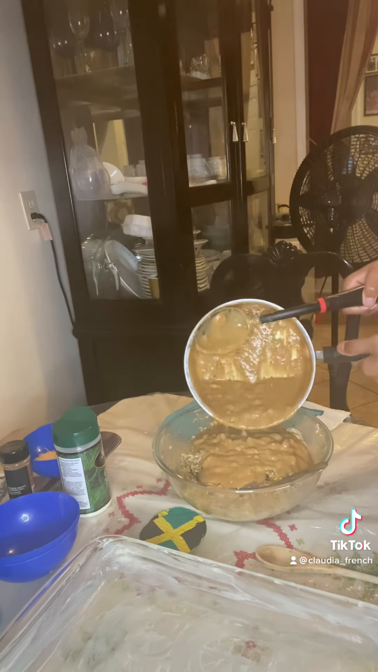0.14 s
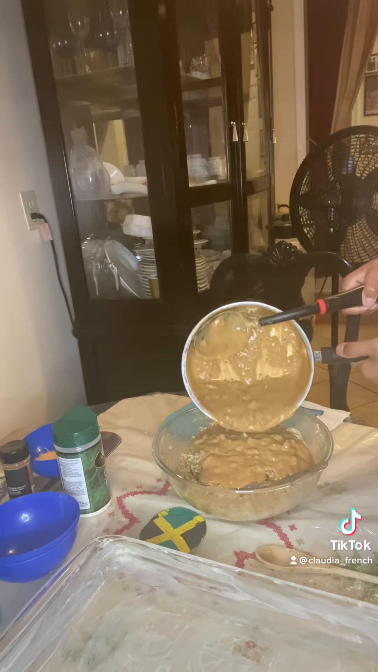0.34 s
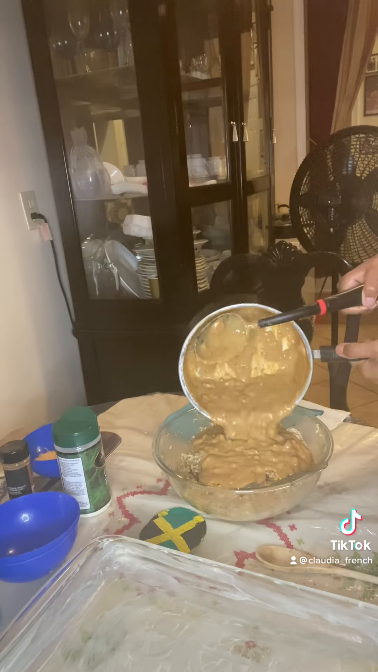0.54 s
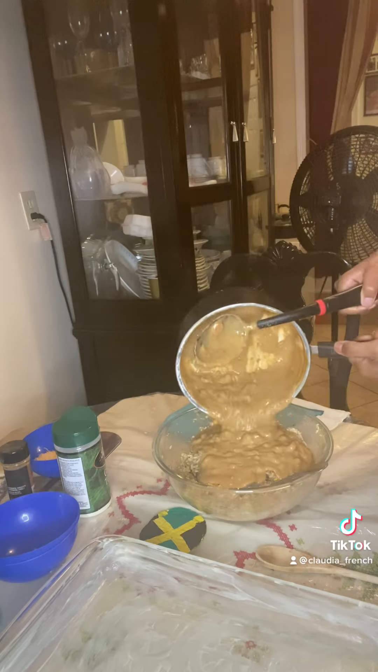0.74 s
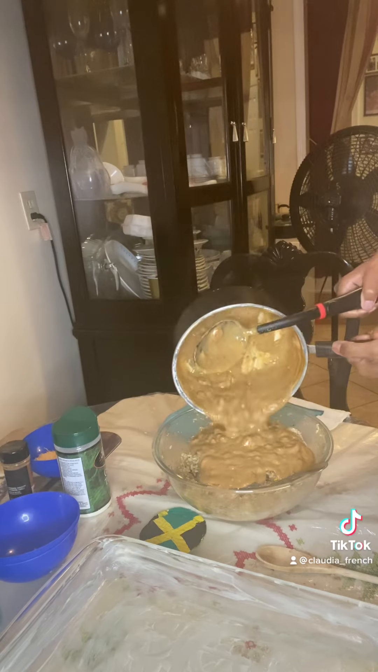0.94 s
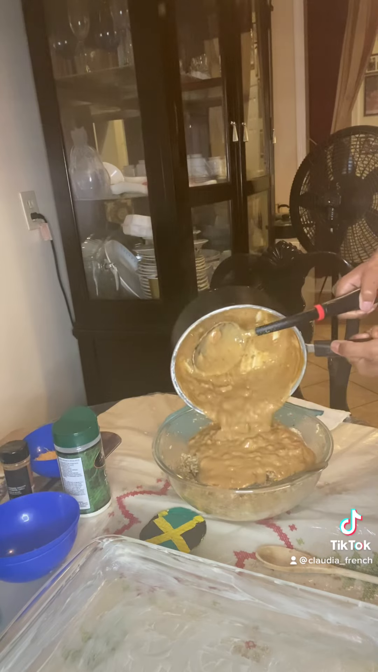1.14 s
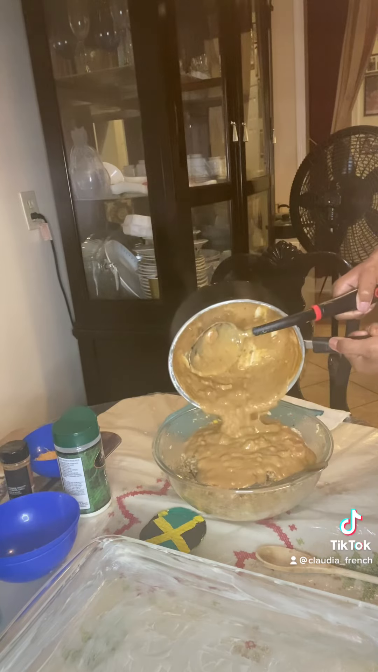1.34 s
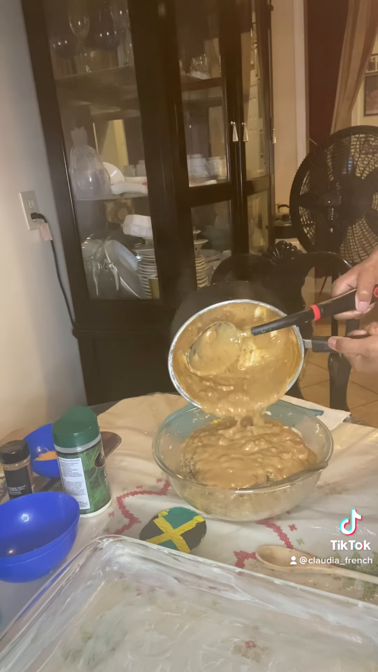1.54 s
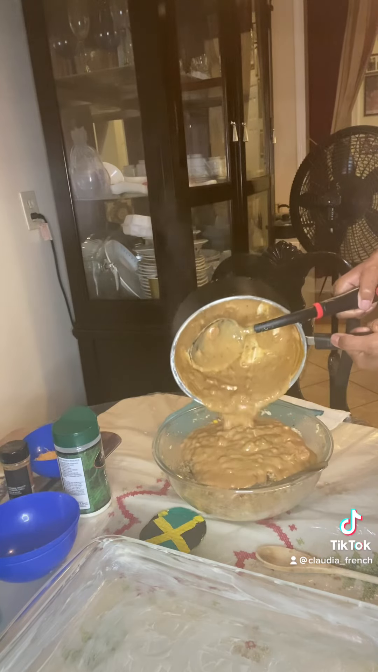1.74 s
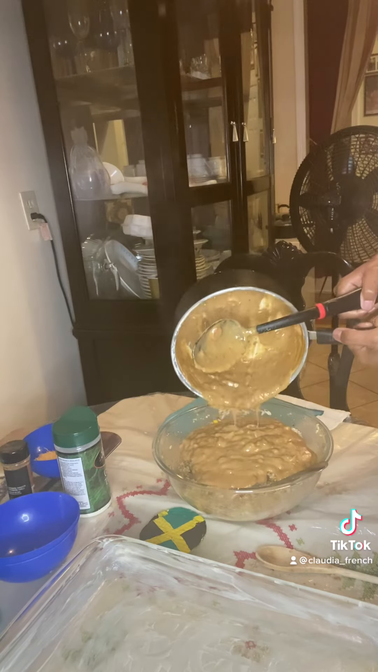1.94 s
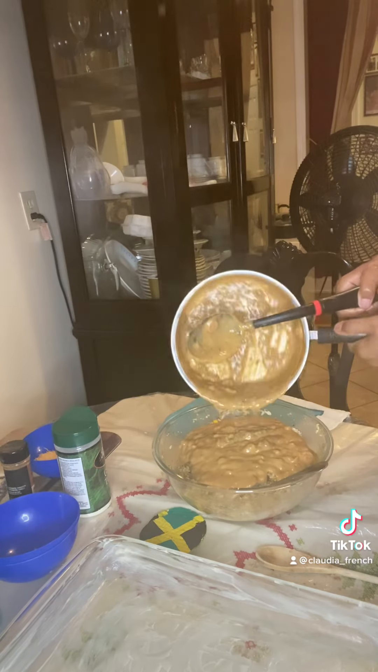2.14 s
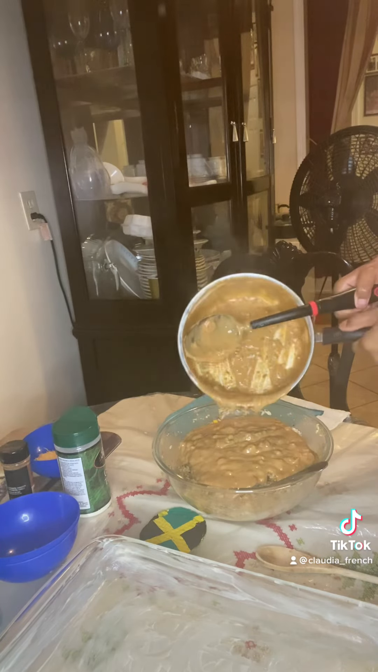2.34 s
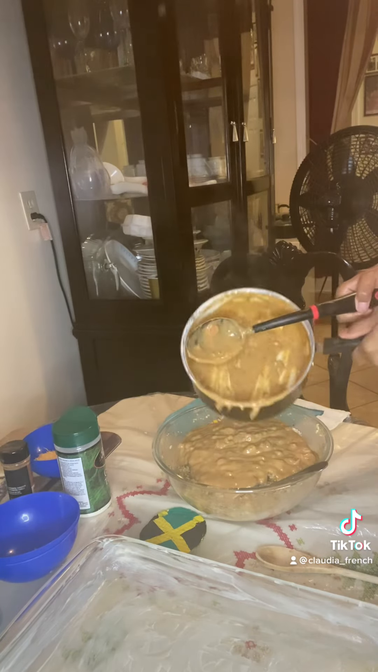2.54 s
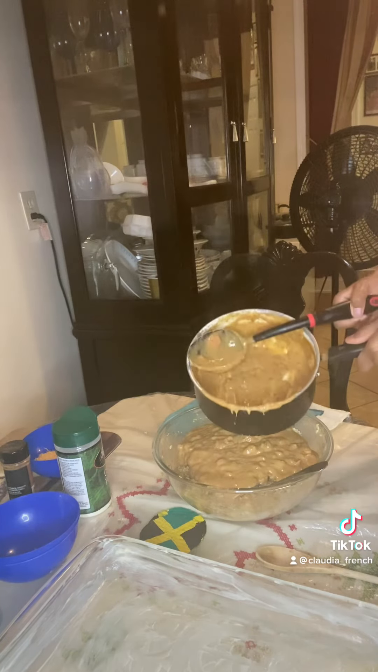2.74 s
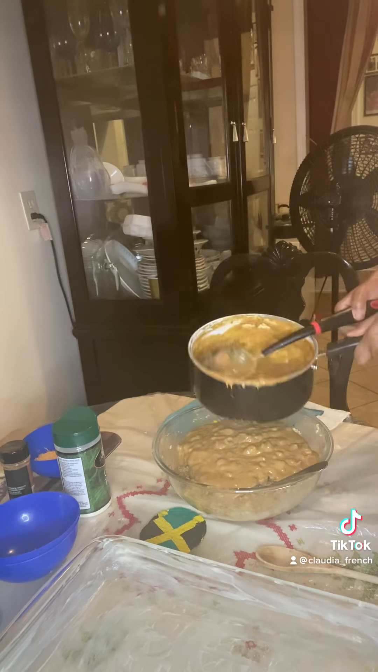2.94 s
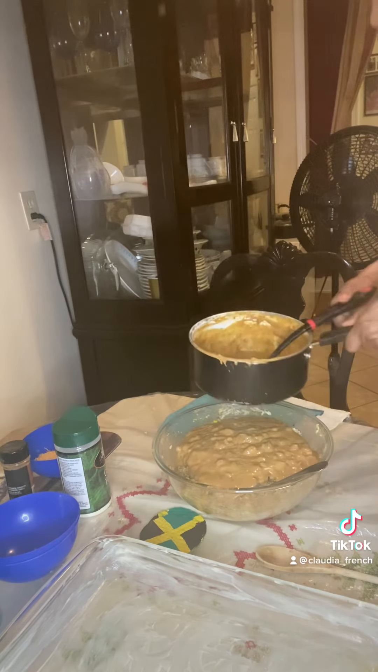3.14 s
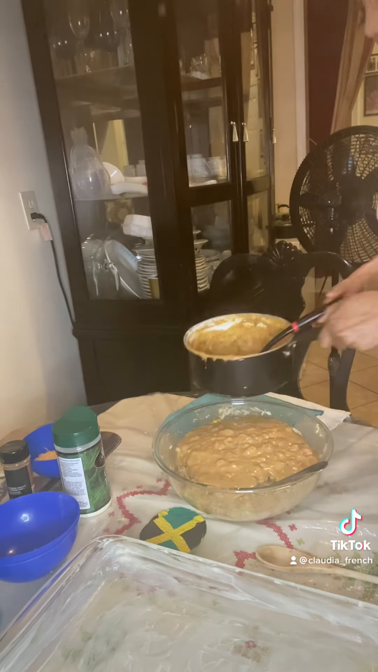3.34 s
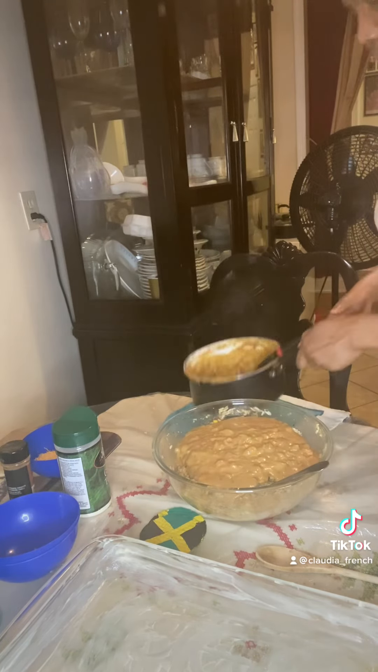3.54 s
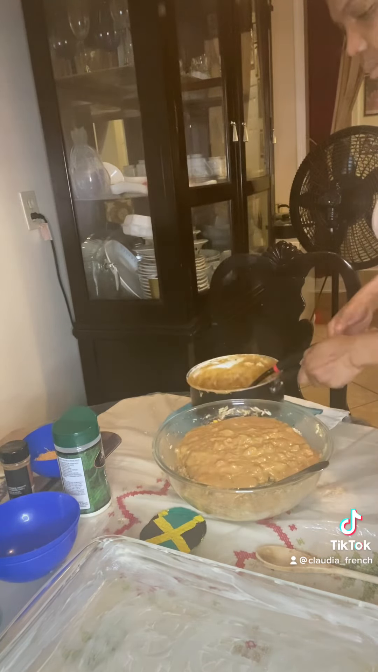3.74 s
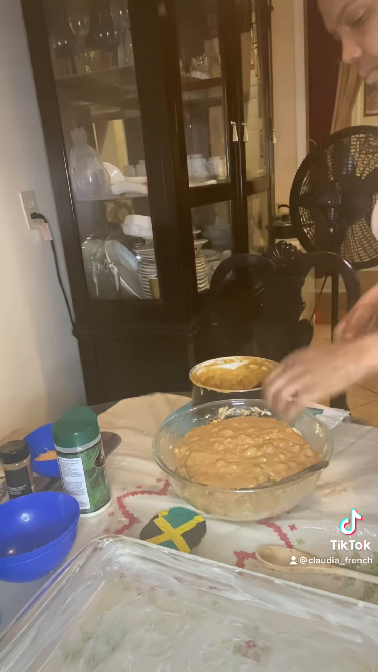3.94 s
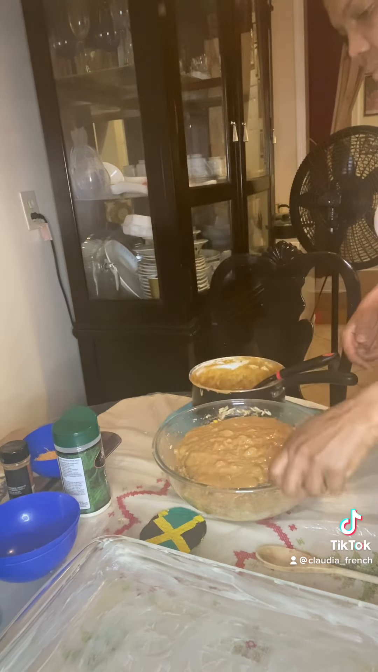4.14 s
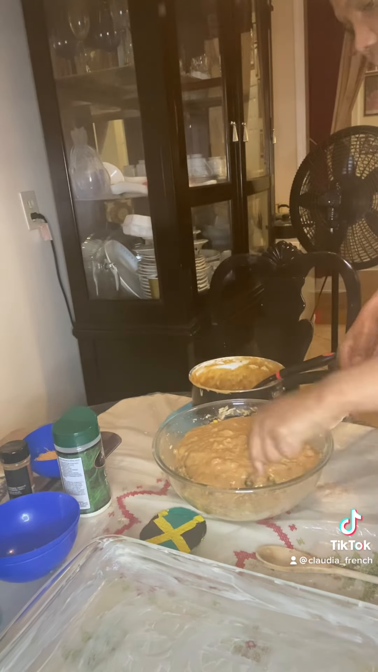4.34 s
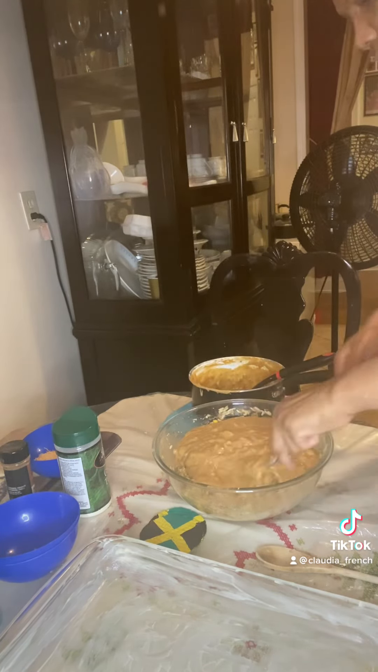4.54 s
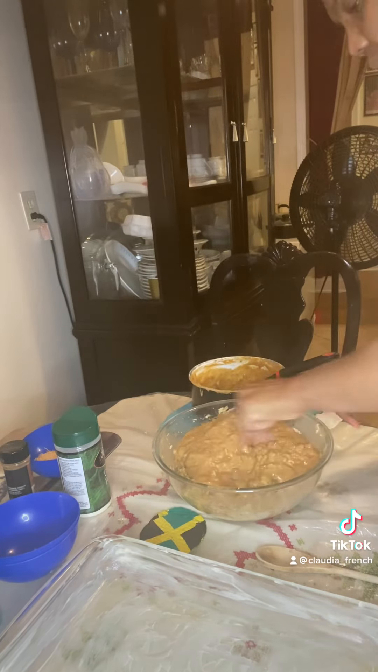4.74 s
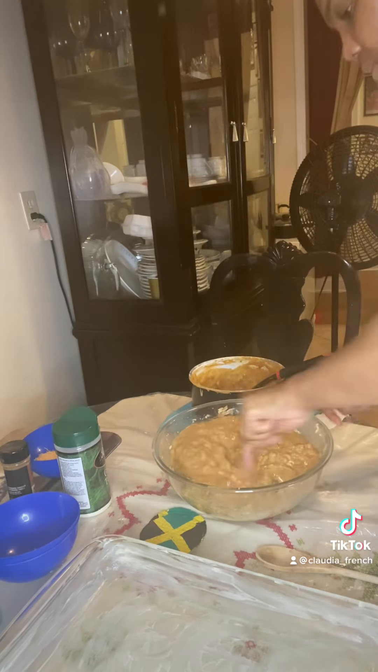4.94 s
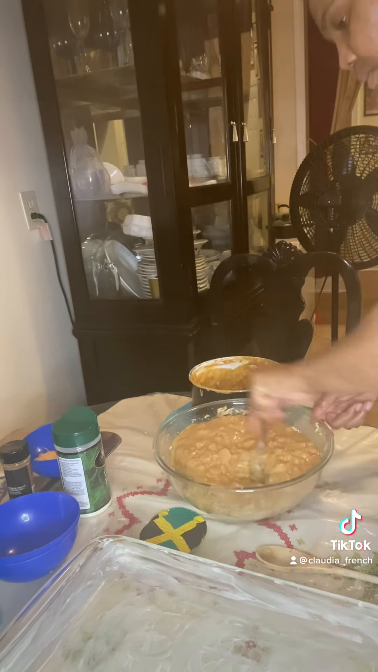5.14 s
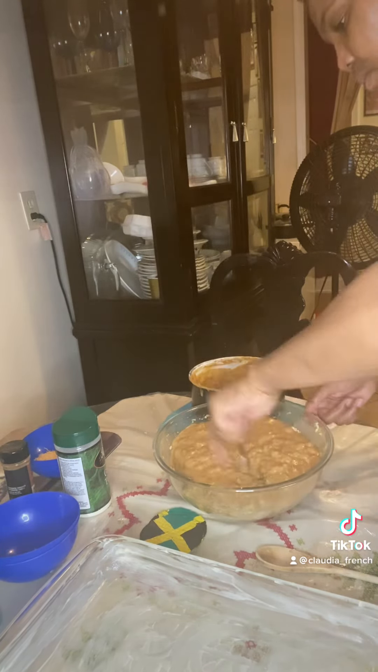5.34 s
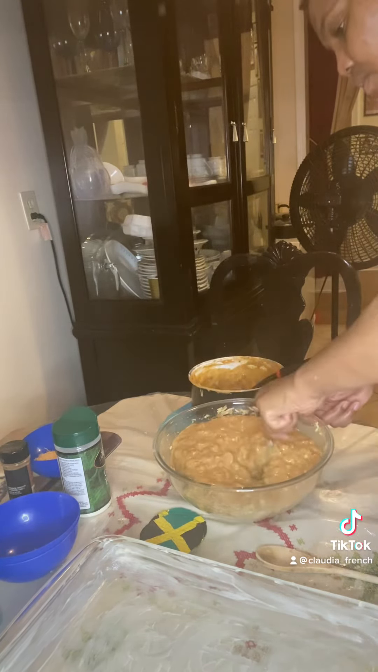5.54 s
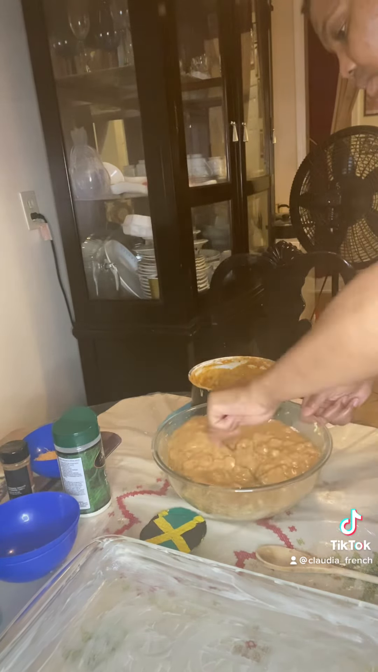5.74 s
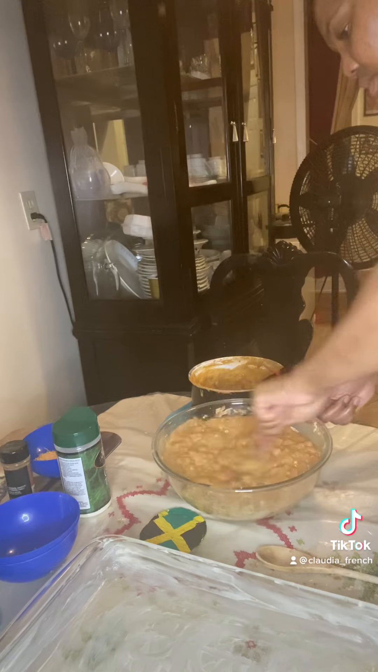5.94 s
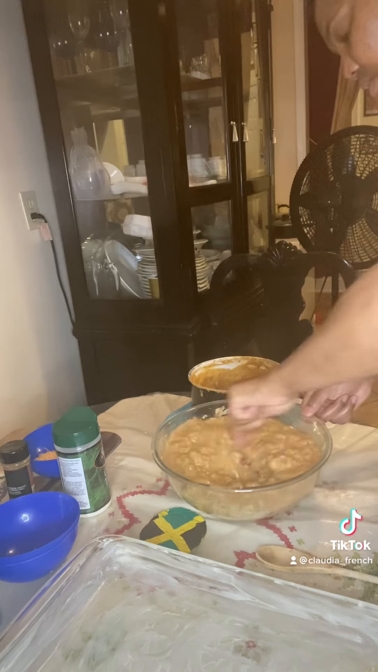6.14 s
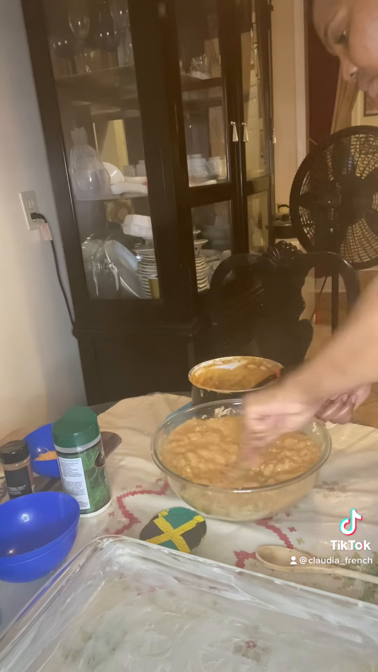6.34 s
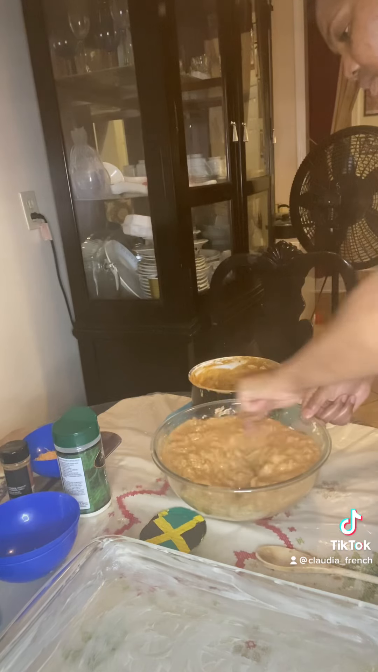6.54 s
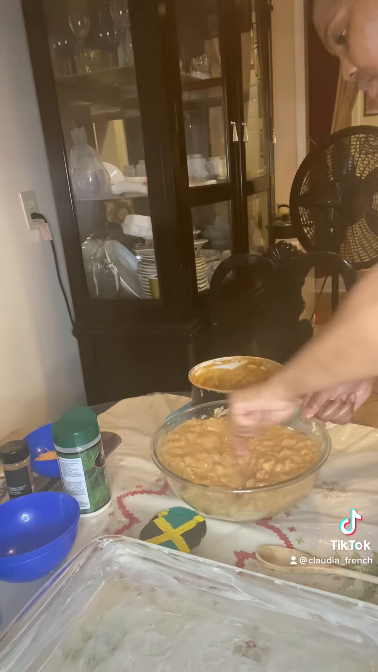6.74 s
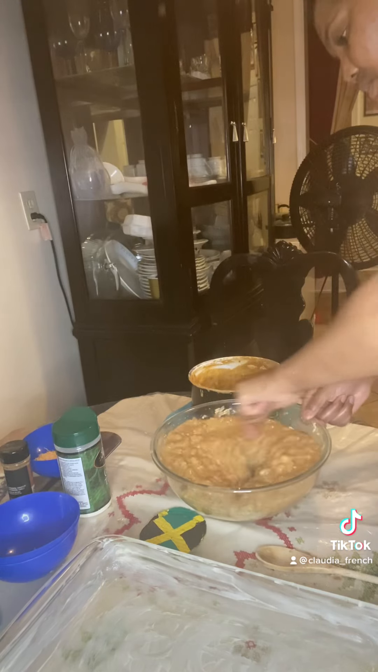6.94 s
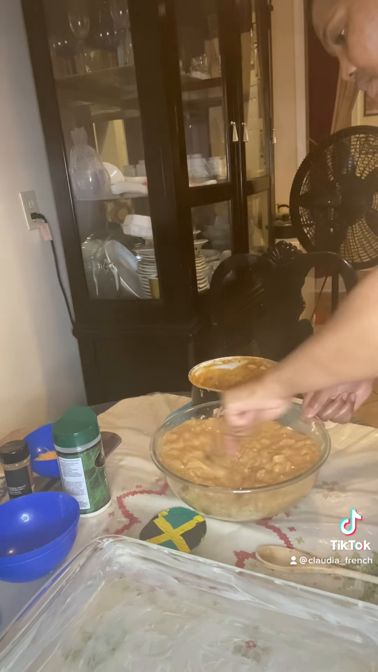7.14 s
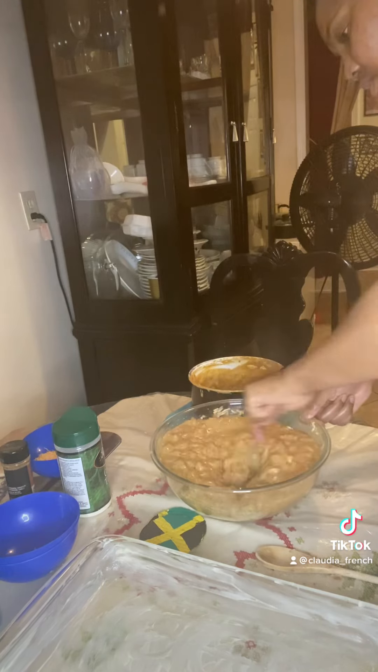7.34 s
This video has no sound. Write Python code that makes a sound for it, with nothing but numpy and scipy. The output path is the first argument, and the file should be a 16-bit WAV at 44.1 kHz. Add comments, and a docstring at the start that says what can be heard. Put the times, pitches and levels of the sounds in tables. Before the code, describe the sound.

In a small kitchen with a faint fan and fridge hum, a phone picks up one ringing knock of a ladle on a steel pan, followed by lighter taps and drags. The pan lands on the table with a clank and a couple of thuds. Quiet, wet stirring follows as a spoon works through stew in a glass bowl, clicking and grinding against the side and finishing with a sharper tap.

```python
"""A ladle knocks and drags in a steel saucepan, exciting its normal modes; the pan is set down on a
table, which thuds and sways. A spoon then stirs stew and rice in a glass bowl, tapping and grinding on
its wall, whose modes the food damps. Impacts ring as sums of decaying sinusoids; the wet grains make
modulated noise. A fan and a fridge fill the small, reverberant kitchen, and a phone picks it all up."""
import sys
import numpy as np
from scipy import signal
from scipy.fft import rfft, irfft, next_fast_len
from scipy.io import wavfile
from scipy.ndimage import uniform_filter1d, map_coordinates

SR = 44100
rng = np.random.default_rng(int(sys.argv[2]) if len(sys.argv) > 2 else 0)


def put_to_file(sound):
    """Save the sound as 16-bit audio at rate SR, in the file named by the first command-line argument."""
    columns = np.atleast_2d(sound).T  # one column per channel
    safe = np.clip(columns, -1, 1)
    whole_steps = np.round(safe * 32767)
    wavfile.write(sys.argv[1], SR, whole_steps.astype(np.int16))


N = 325619
TIME = np.arange(N) / SR
T = np.arange(SR * 9 // 20) / SR  # time within one short sound

# background levels: t/s, fan/dB, fridge/dB
BACKGROUND = [(0.0, -53.5, -54.5), (.5, -56.5, -55.5), (1.44, -61, -57.5), (2.38, -60, -58),
              (2.9, -62.5, -60.5), (4.75, -62.5, -61), (6.04, -63.5, -58.5), (6.52, -59, -60),
              (7.38, -62.5, -56.5)]
# rush of noise and low rumble after the pan is set down: peak t/s, rush/dB, rumble/dB, rise/s, fall/s
SET_DOWN_SWELL = (4, -57, -47.5, 0.16, 0.18)
# noise spectra of airy rush, low rumble and wet grains: f/Hz, relative density/dB
AIR_SPECTRUM = [(88, -19), (150, -1.5), (251, -7), (316, -1), (572, -5.5), (762, -5), (1120, -9.5),
                (1230, -11), (1730, -12.5), (2960, -27), (6610, -42.5), (8980, -41.5), (14500, -46)]
RUMBLE_SPECTRUM = [(20, -37.5), (35, -8), (52, 9), (68, -4), (84, 2.5), (100, -19), (121, -1), (140, -14.5),
                   (165, -5.5), (220, -46)]
GRAIN_SPECTRUM = [(880, -34.5), (1500, -10), (1920, -5), (2890, -11.5), (3950, -7.5), (5610, -14.5),
                  (8590, -12), (9630, -13), (10600, -36), (12400, -7.5), (14500, -27)]
# compressor tones: f/Hz, relative level/dB
COMPRESSOR_TONES = [(53, -6), (84, -9.5), (121, -6.5)]
# impacts: t/s, spot, level/dB, extra bass/dB, extra treble/dB, left bias/dB, accent f/Hz, accent/dB
LADLE_BLOWS = [(0.209, "wall", -16, -3.5, 0.5, 6.5, 3895, 4), (1.309, "side", -41.5, 5, -7.5, 1, 1600, 4),
               (2.171, "side", -32.5, -5, -3.5, 0, 1240, 5.5), (2.188, "wall", -57.5, 8, 13, 7, 5100, 14.5),
               (2.455, "rim", -43, -31, -2.5, 10, 1900, 6.5), (2.829, "rim", -31, 6, 4, 6, 557, 6.5),
               (3.022, "rim", -45.5, 9.5, -15, 4.5, 1020, 3.5),
               (3.483, "flat", -12.5, -0.5, 1, 11.5, 1750, 2.5),
               (3.727, "flat", -43, 25, 0, -1.5, 258, 9.5), (3.892, "base", -32, -3.5, -5, 4.5, 1180, 1.5),
               (3.997, "base", -44.5, -18, 12.5, 7, 3300, 9),
               (4.064, "base", -32, -6, -3.5, 1.5, 1070, 13.5),
               (4.184, "wall", -64.5, 12, 19.5, -1, 4240, 7.5),
               (4.42, "side", -48, 14, -6.5, 6, 2423, 25.5)]
SPOON_BLOWS = [(5.222, "wall", -32.5, 2.5, -1.5, 5.6, 2000, 4.3), (5.483, "wall", -46.5, 0, 4, 22, 339, 3),
               (5.703, "wall", -54, -7, -7, 9.5, 2050, 3), (5.819, "rim", -52, -24, -17, 5.6, 1303, 13),
               (6.188, "wall", -37.5, 2.5, -4.5, 9.8, 1810, 4.9),
               (6.668, "bottom", -39, 3.5, 0.5, 4.9, 1760, 13),
               (6.843, "bottom", -39.5, -4.5, 0, 5.5, 1090, 18),
               (6.897, "rim", -38.5, 4, 2.5, 7, 3530, 9.2),
               (7.054, "wall", -36, -12, -11.5, 5.9, 1665, 5.2),
               (7.124, "rim", -46, -11, -6, 5.4, 2800, 1.5),
               (7.262, "bottom", -43.5, -10, 2, 3.4, 1900, 1.5),
               (7.303, "bottom", -26, -4, -3, 7.8, 4150, 3.6)]
# centres of the excitation bands: f/Hz
BAND_CENTRES = [330, 520, 720, 1000, 1300, 1760, 2050, 2800, 4500, 9000]
# excitation by spot struck: level/dB in each band
PAN_EXCITATION = {"flat": [-8, -9.5, -1, 4, 1, 0.5, -7, -8, -11, -15.5], "wall": [-13.5, 0, -2, -7.5, 2,
                  2.5, -1.5, -4.5, -8, -15.5], "rim": [-32.5, -3.5, -8, 2.5, -1.5, -16.5, -6.5, -14, -16,
                  -22], "base": [-17, -10.5, 1.5, -10, -2, -19.5, -12, -21, -19.5, -33.5], "side": [-18,
                  -27, -34, -12.5, 0.5, -21, -13.5, -27, -15.5, -18.5]}
BOWL_EXCITATION = {"wall": [-5, -2.5, -7.5, -28, -0.5, -5, -4, -5, -4.5, -9], "rim": [-11, -2, -12.5, -35,
                   3.5, -5, -27, -5, -6.5, -17], "bottom": [-7.5, -5.5, -12, -12.5, -16, -8.5, -8.5, -12.5,
                   -8, -13.5]}
# normal modes: f/Hz, level/dB, unscaled T60/s, left bias/dB, right lag/rad
PAN_MODES = [(330, -3.5, 0.2, 4.5, 1.3), (469, -1.5, 0.4, 4.5, 0.5), (526.7, 7, 0.15, 13, 1.2),
             (697.4, 0.5, 0.052, 16, 0.87), (900, -25.5, 0.11, 24, 1), (972, 3.5, 0.15, -2, 2),
             (1027, -11, .12, 3.5, 1), (1210, 9.5, 0.026, 5, 0.61), (1382, 1.5, 0.059, 10, 0.67),
             (1566, -18.5, 0.04, -9.5, 1), (1736, 5.5, 0.11, 3, 1.7), (1845, -4.5, 0.14, -4, 1.2),
             (1942, 6.5, 0.077, 2.5, 0.71), (2147, -5.5, 0.044, 25, 2), (2496, -7.5, 0.35, -24, 0.58),
             (2704, 3, 0.18, -8, 0.57), (2980, -2.5, 0.084, 19, 3), (3630, -5.5, 0.079, 3.5, 1.7),
             (3870, -2, .17, 8, 3.6), (3910, -1.5, 0.14, 10, 6.8), (4340, -9, 0.21, -8.5, 0.67),
             (5023, -2.5, 0.34, 0, 1.1), (6540, -1, 0.24, -3.5, 1.6), (8090, -7, 0.27, 9, 0.91),
             (11100, -4, 0.042, -10.5, .5), (13100, -16, .1, -12.5, .5)]
BOWL_MODES = [(347, 3, 0.072, 9.5, 0.67), (644, -3, 0.1, -24, 0.82), (713, 5.5, 0.039, 11.5, 0.32),
              (1110, -19, 0.013, 12, 1), (1147, 5.5, 0.062, -4, 0.33), (1567, -3, 0.018, 0, 0.43),
              (1794, 12.5, 0.013, -13.5, 0.41), (1974, 4.5, 0.027, -12, 0.27), (2510, 1, 0.036, 28, 1),
              (3235, -4, 0.019, 18, 0.81), (3780, -5, 0.17, 7.5, 0.75), (4230, -2.5, 0.0068, 17, 0.33),
              (4870, -27, 0.008, 29, 1), (6410, 8, 0.02, 27, 1)]
# jolts of the table: t/s, sway/dB, thud/dB, extra for upper modes/dB
JOLTS = [(0.219, -53, -31, -19.5), (3.49, -38, -25.5, -4), (3.728, -35, -21, 1), (4.58, -70, -51.5, -3),
         (5.224, -65.5, -47.5, -9), (5.488, -53, -46, 2.5), (6.188, -52, -54, 1), (7.305, -52, -45, -12)]
# table-top modes: f/Hz, level/dB, T60/s
TABLE_MODES = [(130.6, 1, 0.17), (106, -12.5, 0.5), (236, -3, 0.21), (271.9, -9.5, 0.24),
               (362, -2.5, 0.065), (425, -6, .08), (714, -5.5, 0.016)]
# wet clicks: t/s, peak level/dB, f/Hz
WET_CLICKS = [(1.455, -61, 9300), (2.0275, -65, 5130), (4.3338, -62, 3780), (4.5287, -70, 4340),
              (4.6225, -58, 6750), (4.7601, -61, 4350), (4.986, -57.5, 4180), (5.1732, -57, 4220),
              (5.7756, -57.5, 4170), (6.0173, -58, 3730), (6.0684, -61.5, 3970), (6.329, -60, 3720),
              (6.379, -63, 3230), (6.4476, -55, 6660), (6.5153, -56, 4030), (6.6353, -58.5, 3870),
              (6.718, -65, 7800), (7.23, -60, 5070)]
# ladle drags: peak t/s, level/dB, lower mode re upper/dB, rise/s
LADLE_DRAGS = [(2.232, -52, 9, 0.024), (2.269, -38.5, -5, 0.044), (2.951, -47, -12, 0.023),
               (3.036, -50.5, -14, 0.04), (3.214, -53, -6, .035)]
# strokes through the food: peak t/s, level/dB, extra for low band/dB, rise/s, fall/s
STROKES = [(2.722, -82.5, 6, .008, 1), (3.138, -84.5, 6, 0.17, 0.092), (4.0, -76, 12, 0.26, 0.55),
           (4.183, -72, -13.5, .012, 0.18), (4.622, -87, 8.5, 0.038, 0.41),
           (4.838, -72.5, -2.5, 0.48, 0.08), (5.018, -81, 11.5, 0.19, 0.14), (5.2, -70.5, 5.5, 0.35, 0.23),
           (5.46, -84.5, 6.5, 0.026, .4), (5.744, -69.5, 3.5, 0.049, 0.57),
           (6.029, -69.5, -0.5, 0.015, 0.21), (6.171, -70.5, 0, 0.01, 0.6), (6.462, -73.5, -8, 0.034, .4),
           (6.638, -69, -2, 0.012, 0.092), (6.788, -71, -11.5, 0.015, 0.49), (7.04, -74, 1, .3, .3),
           (7.26, -61.5, -2, 0.032, .2)]
# spoon edge on glass: peak t/s, level/dB, rise/s, fall/s
SPOON_SCRAPES = [(5.822, -62, 0.01, 0.28), (6.438, -61, 0.0099, 0.038), (6.923, -52, 0.095, 0.023),
                 (7.285, -44.5, 0.021, 0.041)]
# likeness of left and right in the room: f/Hz, coherence
COHERENCE = [(60, 0.1), (130, 0.21), (290, 0.11), (1400, 0.067), (6000, 0.088), (12000, 0.37)]
# reverberation time: f/Hz, T60/s
ROOM_DECAY = [(100, 0.049), (500, 0.29), (2000, 0.26), (6000, 0.33), (12000, 0.2)]
# microphone response: f/Hz, gain/dB
MIC_RESPONSE = [(20, 4), (9300, 1.5), (10000, -10.5), (11000, -24.5), (11500, -3), (14000, -23)]


def amp(db):
    """Amplitude ratio of a level."""
    return 10 ** (np.asarray(db) / 20)


def unit(x):
    """Normalisation to unit rms."""
    return x / np.sqrt(np.mean(x ** 2) + 1e-20)


def left_bias(db):
    """Stereo gains for a level difference, left over right."""
    return amp([[db / 2], [-db / 2]])


def along(points, hz):
    """Interpolation of (f/Hz, value) points in log frequency."""
    f, value = np.transpose(points)
    return np.interp(np.log(hz + 1), np.log(f + 1), value)


def swell(s, db, rise, fall):
    """Exponential growth and decay about time s; rise and fall are seconds per 20 dB."""
    t = TIME - s
    return amp(db - 20 * np.maximum(-t / rise, t / fall))


def wobble(rate):
    """Smooth random modulation, rate knots a second."""
    return map_coordinates(rng.standard_normal(int(N * rate / SR) + 4), [TIME * rate])


def filtered(x, response):
    """Linear filtering: the spectrum of x times a frequency response."""
    size = next_fast_len(x.shape[-1] + 8192)
    return irfft(rfft(x, size) * response(np.fft.rfftfreq(size, 1 / SR)), size)[..., :x.shape[-1]]


def crackle(spiky_db, grain_samples):
    """Stepwise amplitude modulation: stereo noise with a random level for each grain."""
    noise = rng.standard_normal((2, N))
    spikes = np.minimum(rng.exponential(size=N // grain_samples + 1), 3)
    return noise * amp(spiky_db * spikes.repeat(grain_samples)[:N])


def rush(spectrum, patchy_db, source=None):
    """Partially coherent stereo noise of unit rms, its gain patchy in time and frequency."""
    cells = signal.stft(rng.standard_normal((2, N)) if source is None else source, nperseg=512)[2]
    patches = uniform_filter1d(uniform_filter1d(rng.standard_normal(cells.shape[1:]), 6, 0), 12, 1)
    pair = signal.istft(cells * amp(patchy_db * unit(patches)), nperseg=512)[1][:, :N]
    angle = lambda f: np.arccos(along(COHERENCE, f)) / 2
    mid, side = filtered(pair, lambda f: amp(along(spectrum, f)) * [np.cos(angle(f)), np.sin(angle(f))])
    return unit(np.array([mid + side, mid - side]))


def add_in_room(mix, s, sound, wet_db):
    """Reverberation: adds at time s the direct sound and its convolution with decaying noise."""
    hz, t, (left, other) = signal.stft(rng.standard_normal((2, len(T))), SR, nperseg=256)
    coherence = along(COHERENCE, hz)[:, None]
    diffuse = np.array([left, coherence * left + np.sqrt(1 - coherence ** 2) * other])
    decay = amp(-60 * t / along(ROOM_DECAY, hz)[:, None])
    tail = signal.istft(diffuse * decay, SR, nperseg=256)[1][:, :len(T)]
    tail = tail * (T > .003) / np.linalg.norm(tail[0])
    wet = signal.fftconvolve(sound.mean(0)[None], tail, axes=1)[:, :len(T)]
    part = mix[:, round(s * SR):][:, :len(T)]
    part += (sound + amp(wet_db) * wet)[:, :part.shape[1]]


def kitchen_noise():
    """Broadband fan noise and low fridge hum; a rush and a rumble also swell after the pan is set down."""
    air = amp(wobble(2.2)) * rush(AIR_SPECTRUM, patchy_db=1.5)
    tones = sum(amp(db + 1.6 * wobble(1.3)) * np.sin(2 * np.pi * hz * TIME + 2.1 * wobble(8) + [[0], [.8]])
                for hz, db in COMPRESSOR_TONES)
    rumble = amp(-3) * rush(RUMBLE_SPECTRUM, patchy_db=0.5) + tones
    times, fan_db, fridge_db = np.transpose(BACKGROUND)
    fan = amp(np.interp(TIME, times, fan_db)) * air
    fridge = amp(np.interp(TIME, times, fridge_db)) * rumble
    s, rush_db, rumble_db, rise, fall = SET_DOWN_SWELL
    set_down = swell(s, rush_db, rise, fall) * air + swell(s, rumble_db, rise, fall) * rumble
    return (fan + fridge + set_down) * left_bias(5)


def impacts(blows, spots, modes, ring_db, t60_scales, rise_s, lead_in_db, contact_db, rattle_t60, wet_db):
    """Modal superposition: the spot struck weights both the decaying modes and the contact noise."""
    mix = np.zeros((2, N))
    hz, level, t60, mode_bias, lag = np.transpose(modes)[..., None]
    high = hz > 2300
    t60 = t60 * np.where(high, t60_scales[1], t60_scales[0])
    lead_in_s = .009  # faint noise swells in just before each hit
    after = np.maximum(T - lead_in_s, 0)
    attack = 1 - np.exp(-(after / rise_s) ** 2)
    noise_onset = attack + amp(lead_in_db) * np.minimum(T / lead_in_s, 1) * (1 - attack)
    rattle, tick = amp(-60 * after / rattle_t60), amp(7 - 60 * after / .006)
    bass = along([(330, 1), (720, 0)], np.array(BAND_CENTRES))
    treble = along([(1500, 0), (9000, 1)], np.array(BAND_CENTRES))
    for s, spot, db, bass_db, treble_db, bias_db, accent_hz, accent_db in blows:
        strength = db + np.array(spots[spot]) + bass_db * bass + treble_db * treble
        accent = lambda f: accent_db * np.exp(-(np.log2((f + 1) / accent_hz) / 0.11) ** 2)
        colour_db = lambda f: along(list(zip(BAND_CENTRES, strength)), f) + accent(f)
        side_db = lambda f: bias_db / 2 / (1 + (f / 4000) ** 2)  # the bias fades in the treble
        high_db = -5.5 + .25 * min(strength[-2] + 25, 0)  # light taps hardly excite high modes
        drive_db = colour_db(hz) + high_db * high + rng.normal(0, 1.2, hz.shape)
        envelope = amp(ring_db + level + drive_db - 60 * after / t60) * attack
        phase = 2 * np.pi * hz * (1 + rng.normal(0, 0.0042, hz.shape)) * (T - lead_in_s)
        left = amp(mode_bias / 2 + side_db(hz))
        ring = np.array([(envelope * left * np.sin(phase)).sum(0),
                         (envelope / left * np.sin(phase - lag)).sum(0)])
        hard_db = .25 * max(max(strength) + 35, 0)  # hard blows ring more than they rattle
        contact_gain = noise_onset * amp(contact_db - hard_db) * (rattle + tick)
        mid, side = rng.standard_normal((2, len(T))) * contact_gain
        shape = lambda f: amp(colour_db(f) + [side_db(f), -side_db(f)]) * f / (f + 150) / np.sqrt(f + 1)
        contact = filtered(mid + [[.6], [-.6]] * side, shape)
        add_in_room(mix, s - lead_in_s, ring + contact, wet_db)
    return mix


def pan_knocks():
    """Free vibration of the steel pan after each blow of the ladle."""
    return impacts(LADLE_BLOWS, PAN_EXCITATION, PAN_MODES, ring_db=-5.5, t60_scales=(0.62, 0.4),
                   rise_s=.0021, lead_in_db=-28.5, contact_db=42.5, rattle_t60=0.054, wet_db=0)


def table_jolts(sway_hz=49, sway_t60=1.1):
    """Damped oscillation: the table top thuds in its modes and the table sways on its legs."""
    mix = np.zeros((2, N))
    for s, sway_db, thud_db, upper_db in JOLTS:
        thud = 0
        for hz, db, t60 in TABLE_MODES:
            decay = amp(thud_db + db + upper_db * (hz > 180) - 60 * T / t60)
            thud += decay * (1 - np.exp(-T * hz / 0.71)) * np.sin(2 * np.pi * hz * T)
        add_in_room(mix, s, thud * left_bias(5), wet_db=-1)
        since = np.maximum(TIME - s, 0)
        envelope = amp(sway_db - 60 * since / sway_t60) * (1 - np.exp(-since / 0.043))
        mix += envelope * np.sin(2 * np.pi * sway_hz * since) * left_bias(-3)
    return mix


def wet_clicks(t60=0.016):
    """Band-limited transients: single squelches of grains and stew."""
    mix = np.zeros((2, N))
    for s, db, hz in WET_CLICKS:
        burst = rng.standard_normal(len(T)) * amp(-60 * T / t60) * (1 - np.exp(-T / 0.00059))
        snap = filtered(burst, lambda f: np.exp(-np.log((f + 1) / hz) ** 2 / 0.078))
        add_in_room(mix, s, amp(db) * snap / np.abs(snap).max() * left_bias(3), wet_db=3.5)
    return mix


def ladle_drag(fall_s=0.039):
    """Beating: the dragged ladle sustains two close pan modes unevenly, with a faint higher one."""
    lower, upper, top = (np.sin(2 * np.pi * PAN_MODES[k][0] * TIME + 1.53 * wobble(25))
                         for k in (1, 2, 12))
    hum = sum(swell(s, db, rise, fall_s) * (upper + amp(lower_db) * lower + amp(-23) * top)
              for s, db, lower_db, rise in LADLE_DRAGS)
    return hum * left_bias(5)


def stirring():
    """Granular noise: wet grains hiss in a low and a high band that swell with each stroke."""
    hiss = rush(GRAIN_SPECTRUM, patchy_db=2, source=crackle(spiky_db=3.2, grain_samples=70))
    low = filtered(hiss, lambda f: 1 / (1 + (f / 4500) ** 4))
    high = hiss - low
    high_gain = sum(swell(s, db, rise, fall) for s, db, _, rise, fall in STROKES)
    low_gain = sum(swell(s, db + low_db, rise, fall) for s, db, low_db, rise, fall in STROKES)
    return amp(0.58 * wobble(23)) * (low_gain * low + high_gain * high) / np.std(high)


def bowl_taps():
    """Damped vibration: the stew shortens the ring of the glass after each tap of the spoon."""
    return impacts(SPOON_BLOWS, BOWL_EXCITATION, BOWL_MODES, ring_db=-2.5, t60_scales=(0.69, 0.38),
                   rise_s=.0008, lead_in_db=-32.5, contact_db=41.5, rattle_t60=0.025, wet_db=1.5)


def spoon_grinding(bandwidth_hz=220):
    """Forced resonance: the spoon edge stutters along the glass and drives four middle modes."""
    resonance = lambda f, hz: 1j * f * bandwidth_hz / (hz * hz - f * f + 1j * f * bandwidth_hz)
    glass = lambda f: sum(resonance(f, hz) for hz, *_ in BOWL_MODES[3:7]) / (1 + (f / 2500) ** 2)
    stutter = crackle(spiky_db=2.5, grain_samples=60)
    return sum(swell(*row) for row in SPOON_SCRAPES) * unit(filtered(stutter, glass)) * left_bias(3)


def scene():
    """Superposition: the pressures of all sources add."""
    return (pan_knocks() + bowl_taps() + ladle_drag() + table_jolts()
            + stirring() + wet_clicks() + spoon_grinding() + kitchen_noise())


def record(dry):
    """Transduction: the phone dips just above 10 kHz, saturates softly and cuts off at 14.6 kHz."""
    heard = filtered(dry, lambda hz: amp(along(MIC_RESPONSE, hz)))
    rounded = heard / (1 + np.abs(heard / .93) ** 4) ** (1 / 4)
    return filtered(rounded, lambda hz: hz < 14600)


dry = scene()
out = record(dry)
put_to_file(out)
```